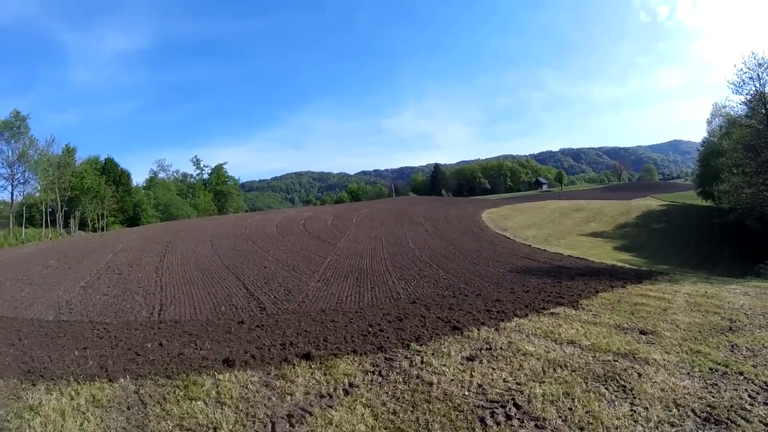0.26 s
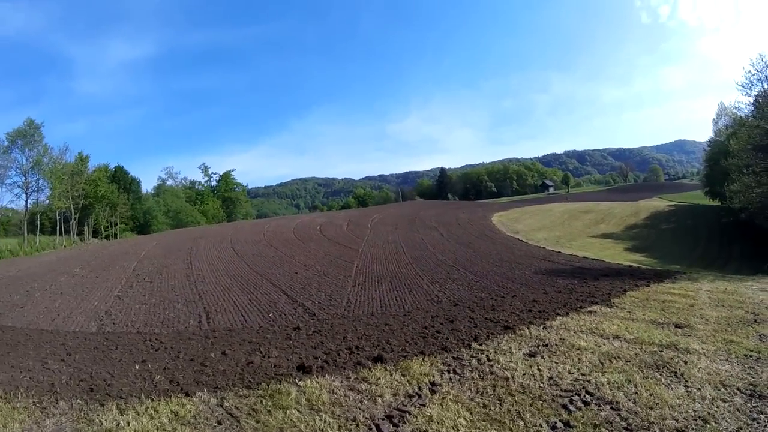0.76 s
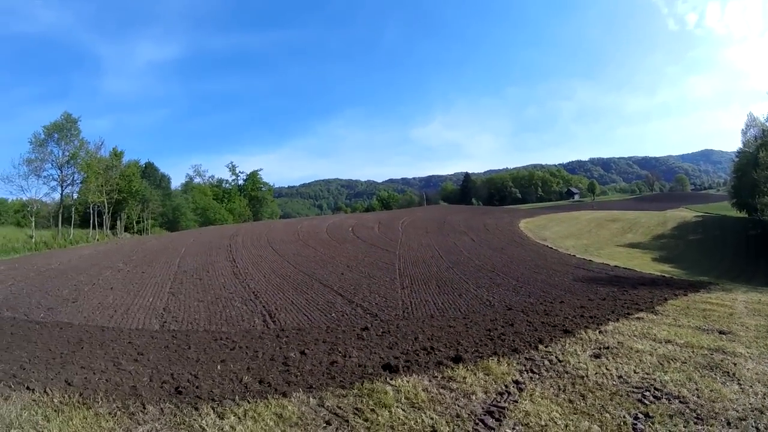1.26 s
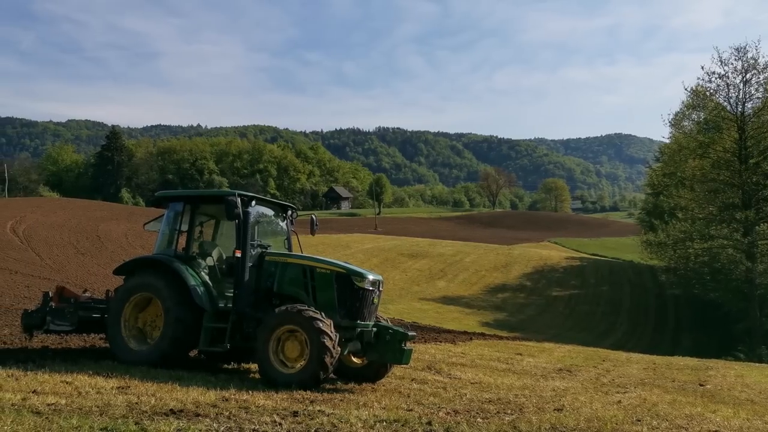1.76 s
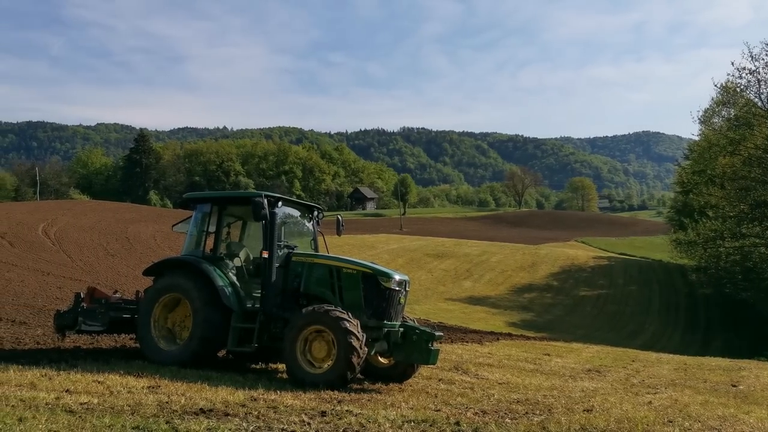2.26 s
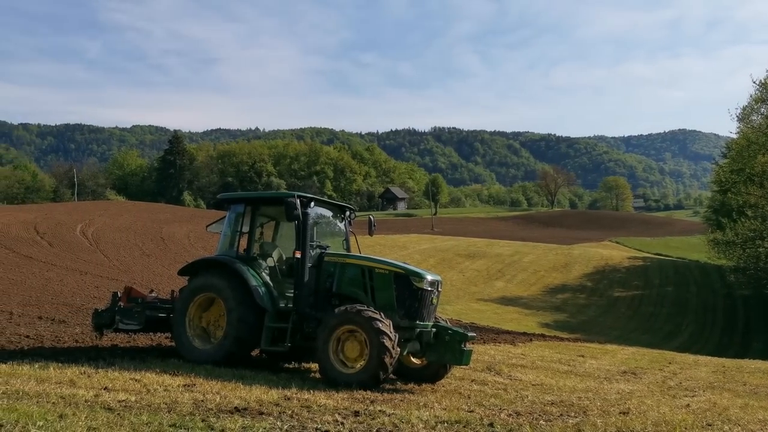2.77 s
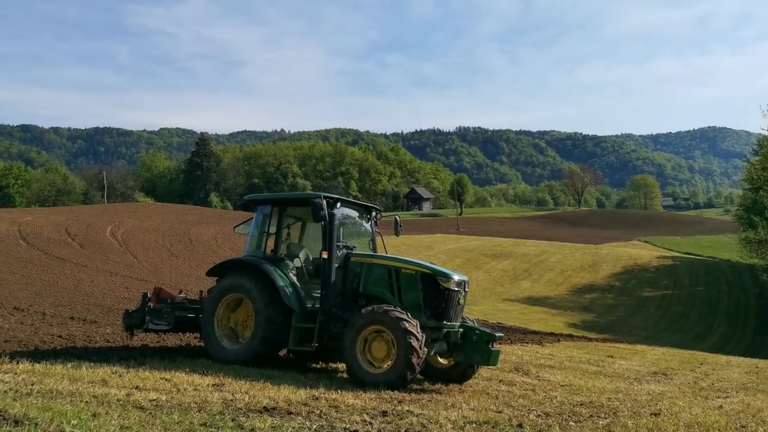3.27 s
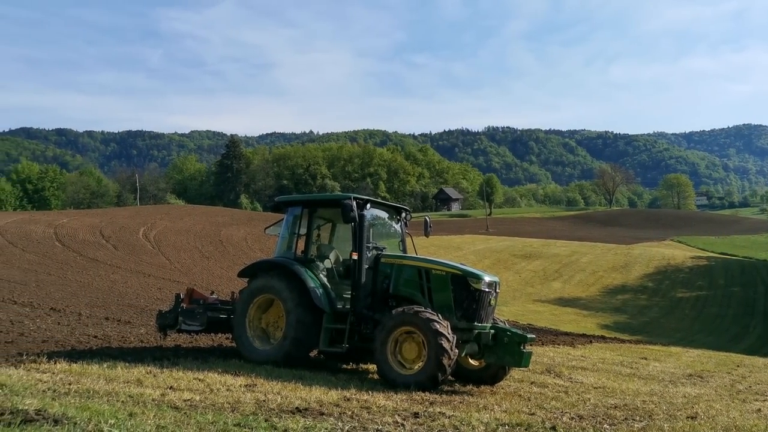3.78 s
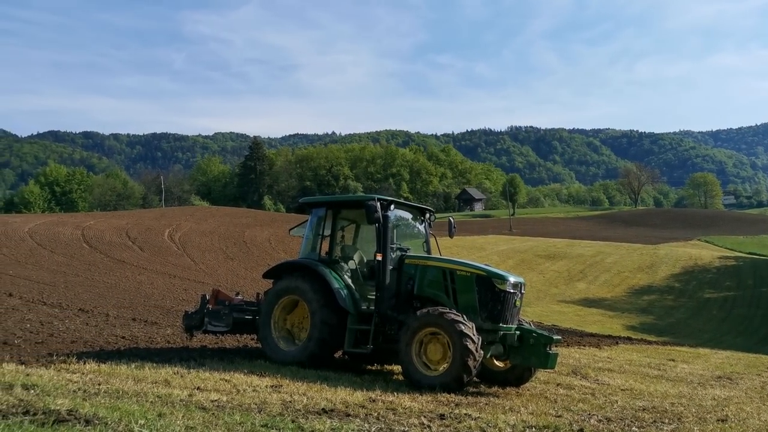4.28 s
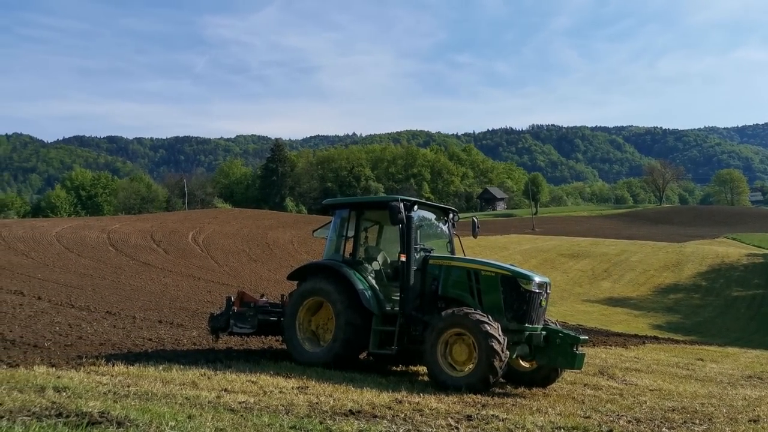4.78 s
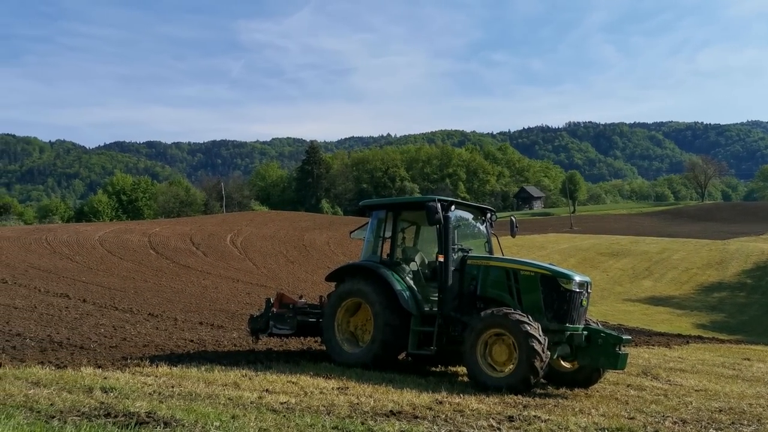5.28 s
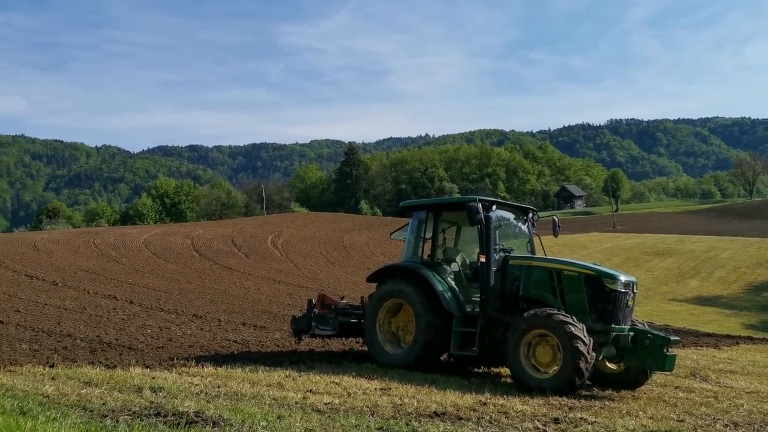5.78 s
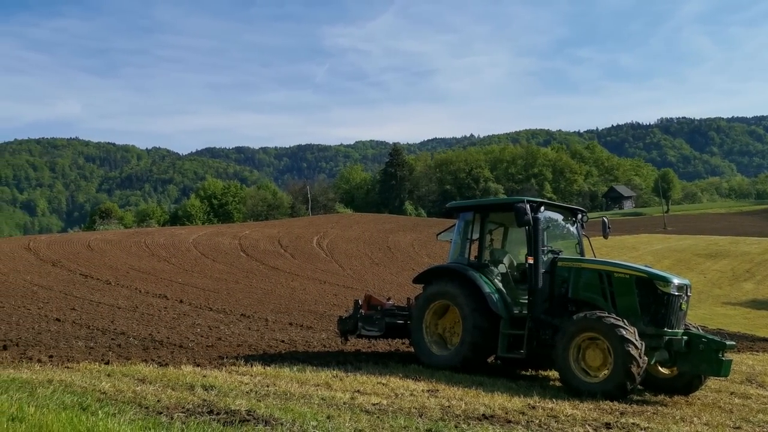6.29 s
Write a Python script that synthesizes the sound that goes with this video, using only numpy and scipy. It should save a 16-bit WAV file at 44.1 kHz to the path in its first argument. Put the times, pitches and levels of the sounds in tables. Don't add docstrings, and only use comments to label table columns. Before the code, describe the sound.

A diesel tractor drones at working revs with gear whine and jolting rumble, then abruptly switches to a quieter, slow, knocking engine clatter farther off.

```python
import sys
import numpy as np
from scipy import signal
from scipy.fft import rfft, irfft, next_fast_len
from scipy.io import wavfile
from scipy.ndimage import uniform_filter1d, map_coordinates

SR = 44100
rng = np.random.default_rng(int(sys.argv[2]) if len(sys.argv) > 2 else 0)


def wrap_up_sound(samples):
    columns = np.atleast_2d(samples).T
    tamed = np.clip(columns, -1, 1)
    steps = np.round(tamed * 32767).astype(np.int16)
    wavfile.write(sys.argv[1], SR, steps)


def level_to_linear(level):
    exponent = np.asarray(level, float) / 20
    return 10 ** exponent


N = 288414
T = np.arange(N) / SR
CUT = 1.458
NEAR_SHAFT_HZ = 25.41
FAR_SHAFT_HZ, FAR_FIRST = 14.998, 0.0195

# [f/Hz, width/Hz, lift/dB]
BLOCK = [(1150, 26, 0.5), (1373, 30, -1), (1630, 110, 3.5), (1724, 75, 0.5), (1910, 200, 5.5),
         (2037, 84, 5.5), (2295, 260, 7), (2715, 320, 2.5), (2980, 70, 1.5), (3050, 170, 6), (3268, 94, 5),
         (3420, 75, 4.5), (3670, 90, 4), (3900, 53, 2), (4110, 67, 2), (4530, 90, 4), (4700, 210, 3.5),
         (4950, 130, 4.5), (5280, 100, 3), (6730, 140, 5), (7886, 142, 12.5)]


def unit(x):
    return x / np.sqrt(np.mean(x ** 2) + 1e-20)


def along(points, hz):
    f, v = np.transpose(points)
    return np.interp(np.log(hz + 1), np.log(f + 1), v)


def wobble(rate):
    return map_coordinates(rng.standard_normal(int(N * rate / SR) + 4), [T * rate])


def filtered(x, response):
    m = next_fast_len(N + 8192)
    return irfft(rfft(x, m) * response(np.fft.rfftfreq(m, 1 / SR)), m)[..., :N]


def coloured(x, points_db):
    return filtered(x, lambda f: level_to_linear(along(points_db, f)))


def above(hz, edge_hz):
    return 1 / np.sqrt(1 + (edge_hz / (hz + 1)) ** 8)


def below(hz, edge_hz):
    return np.sqrt(1 - above(hz, edge_hz) ** 2)


def peak(hz, centre_hz, width_hz):
    return 1 / (1 + (2 * (hz - centre_hz) / width_hz) ** 2)


def spells(rows, idle_db, edge_s):
    gain = level_to_linear(idle_db)
    for start, length, db in rows:
        switched_on = np.clip((T - start) / edge_s + 0.5, 0, 1)
        switched_off = np.clip((T - start - length) / edge_s + 0.5, 0, 1)
        gain = gain + level_to_linear(db) * (switched_on - switched_off)
    return gain


def smooth_cells(shape, bands, frames):
    field = uniform_filter1d(rng.standard_normal(shape), size=bands, axis=0)
    return unit(uniform_filter1d(field, size=frames, axis=1))


def starved(x, odds):
    hz, _, z = signal.stft(x, SR, nperseg=1024)
    empty = smooth_cells(z.shape[-2:], 4, 4) < along(odds, hz)[:, None]
    return signal.istft(z * np.where(empty, 0.03, 1), SR, nperseg=1024)[1][..., :N]


def patchy(x, depth_db):
    z = signal.stft(x, nperseg=256)[2]
    gain = level_to_linear(depth_db * smooth_cells(z.shape[-2:], 6, 10))
    return signal.istft(z * gain, nperseg=256)[1][..., :N]


def firings(shaft_hz, first, cylinders_db, scatter_db):
    n = np.arange(int((T[-1] - first) * 2 * shaft_hz) + 1)
    chance = rng.standard_normal((len(n), 2))
    moment = first + n / (2 * shaft_hz) + 0.00012 * chance[:, 0]
    at = np.clip(moment * SR, 0, N - 1).astype(int)
    return np.bincount(at, level_to_linear(np.array(cylinders_db)[n % 4] + scatter_db * chance[:, 1]), N)


def gate(blows, rise, t60, steady):
    t = np.arange(SR // 10) / SR
    burst = (1 - np.exp(-t / rise)) ** 2 * level_to_linear(-60 * t / t60)
    return unit(steady + unit(signal.fftconvolve(blows, burst)[:N]))


def racket(body, knock, tick, knock_hz, tick_hz):
    noise = rng.standard_normal((3, 2, N))
    bass = filtered(body * noise[0], lambda f: below(f, knock_hz))
    middle = filtered(knock * noise[1], lambda f: above(f, knock_hz) * below(f, tick_hz))
    top = filtered(tick * noise[2], lambda f: above(f, knock_hz) * above(f, tick_hz))
    return bass + middle + top


def rocking():
    # [t/s, strength/dB]
    jolts = [
        (0.0, 5),
        (.29, 7),
        (.57, 6.5),
        (.84, 6.5),
        (1.18, 0),
        (1.41, 8.5),
    ]
    half_width = 0.056
    swell = sum(db * np.exp(-((T - s) / half_width) ** 2 / 2) for s, db in jolts)
    return np.where(T < CUT, swell - swell[T < CUT].mean(), 0)


def cab_noise(boom_db):
    # [f/Hz, density/dB per Hz]
    low_colour = [(15, -21), (30, -3), (60, -3.5), (120, -6), (200, -6), (240, -11.5), (430, -6),
                  (630, -12.5), (1200, -14), (1500, -17.5), (1700, -18.5)]
    high_colour = [(1700, -19), (3000, -23.5), (4100, -31.5), (4700, -28.5), (6000, -34), (6500, -31.5),
                   (7300, -42.5), (8000, -40.5), (10000, -55.5), (11400, -58.5), (12000, -62), (14400, -66),
                   (15200, -72)]
    # [f/Hz, threshold/sigma]
    holes = [(6500, -4), (7200, -.5), (9000, -.5), (10500, -1.6), (12000, -4)]
    top_hz = 15150
    blows = firings(NEAR_SHAFT_HZ, 0.018, [1.5, 6.0, 2.5, 1], scatter_db=2.5)
    clatter = gate(blows, rise=0.0014, t60=0.039, steady=4.3) * level_to_linear(0.031 * boom_db + 0.76 * wobble(15.2))
    rumble = level_to_linear(1.1 * boom_db)
    body = level_to_linear(0.067 * boom_db + 0.28 * wobble(12.0))
    noise = racket(rumble, body, clatter, 97, 1230)[0]
    colour = low_colour + high_colour[1:]
    noise = filtered(noise, lambda f: level_to_linear(along(colour, f)) * (f < top_hz))
    return starved(level_to_linear(-26.5) * unit(noise), holes)


def gear_meshes():
    # [f/Hz, width/Hz, rms level/dB]
    gears = [(758.4, 4.7, -41), (791, 8, -50), (855, 17, -42), (965, 6.4, -47), (1038, 5.7, -41),
             (1148, 14, -46.5), (1601, 80, -39)]

    def mesh(f):
        return sum(level_to_linear(db) / np.sqrt(w / SR * np.pi) * peak(f, c, w) for c, w, db in gears)
    return filtered(rng.standard_normal(N), mesh)


def lift_pump(boom_db):
    # [start t/s, length/s, level/dB]
    work = [
        (.15, .8, -51.5),
    ]
    hiss = unit(filtered(rng.standard_normal(N), lambda f: peak(f, 4700, 450)))
    pitch_hz = 4620 + 90.7 * wobble(9) + 70.2 * wobble(400)
    note = 1.1 * np.sin(2 * np.pi * np.cumsum(pitch_hz) / SR)
    strength = spells(work, idle_db=-62, edge_s=0.074) * level_to_linear(0.65 * boom_db + 2.9 * wobble(25))
    return strength * unit(hiss + note)


def gear_whine(turns):
    # [start t/s, length/s, level/dB]
    singing = [
        (-.05, .13, -37),
        (.47, .72, -33.5),
        (1.235, .3, -36.5),
    ]
    teeth = 698.5 / NEAR_SHAFT_HZ
    strength = spells(singing, idle_db=-40.5, edge_s=0.04) * level_to_linear(2 * wobble(21.83))
    return 1.03 * strength * np.sin(2 * np.pi * turns * teeth + 0.88 * wobble(30.4))


def passing_racket(body_db, clatter_db):
    # [f/Hz, likeness 0 to 1]
    alike = [(30, 0.46), (70, 0.87), (130, 0.97), (600, .99), (1300, 0.87), (2000, 0.52), (3400, 0.043),
             (5000, 0.063), (9000, 0.053)]
    blows = firings(FAR_SHAFT_HZ, FAR_FIRST + 0.001, [0.2, -1.6, -0.9, 1.9], scatter_db=1.2)
    body = gate(blows, rise=0.0046, t60=0.11, steady=2.0) * level_to_linear(1.1 * body_db + 0.19 * wobble(9.9))
    knock = gate(blows, rise=0.0075, t60=0.085, steady=0.62) * level_to_linear(clatter_db + 0.2 * wobble(4.96))
    ticks = firings(FAR_SHAFT_HZ, FAR_FIRST, [4.2, 1.0, 3.0, 3.2], scatter_db=1.5)
    tick = gate(ticks, rise=0.0025, t60=0.082, steady=0.62) * level_to_linear(clatter_db + 0.21 * wobble(5.26))

    def ring_and_spread(f):
        ring_db = sum(db * peak(f, c, w) ** 2 for c, w, db in BLOCK)
        angle = np.arccos(np.clip(along(alike, f), 0, 1)) / 2
        return level_to_linear(ring_db) ** 1.04 * np.array([np.cos(angle), np.sin(angle)])
    return filtered(patchy(racket(body, knock, tick, 1040, 7400), depth_db=0.5), ring_and_spread)


def nozzles():
    t = np.arange(SR // 20) / SR
    ping = (1 - np.exp(-t / 0.001)) * level_to_linear(-60 * t / 0.027) * np.sin(2 * np.pi * 7630 * t)
    lifts = firings(FAR_SHAFT_HZ, FAR_FIRST + 0.001, [8.0, -6, 0.3, -1.0], scatter_db=3.5)
    return unit(signal.fftconvolve(lifts, ping)[:N])


def struck_block():
    t = np.arange(SR // 20) / SR
    swell = (1 - np.exp(-t / 0.006)) ** 2
    total = np.zeros(N)
    for c, w, db in BLOCK:
        blows = firings(FAR_SHAFT_HZ, FAR_FIRST + 0.0035, [0.49, -0.2, -0.43, 0.34], scatter_db=4.5)
        ring = swell * np.exp(-np.pi * w * 1.2 * t) * np.sin(2 * np.pi * c * t)
        total += signal.fftconvolve(blows, level_to_linear(2.32 * db) * np.sqrt(w) * ring)[:N]
    return unit(total)


def exhaust_orders(table, turns, spread, drift, unsteady_db):
    total = np.zeros(N)
    for k, db in table:
        strength = np.sqrt(2) * level_to_linear(db + unsteady_db * wobble(6.49))
        phase = spread * rng.standard_normal() + drift * np.sqrt(k) * wobble(5)
        total -= strength * np.cos(2 * np.pi * k * turns + phase)
    return total


def on_board():
    # [shaft order, rms level/dB]
    near_orders = [(1, -37), (2, -32), (4, -31), (6, -32.5), (7, -39.5), (7.5, -45.5), (8, -40),
                   (10, -45.5), (12, -48.5), (14, -37.5), (16, -56), (18, -40.5), (22, -48)]
    boom_db = rocking()
    turns = NEAR_SHAFT_HZ * (T - 0.004 + 0.00066 * wobble(3.84))
    take_up_db = np.clip((T - 0.47) / 0.07, 0, 1) - 0.7
    exhaust = exhaust_orders(near_orders, turns, spread=1.2, drift=0.063, unsteady_db=1.0)
    exhaust = level_to_linear(0.24 * boom_db + take_up_db) * exhaust
    return cab_noise(boom_db) + gear_meshes() + lift_pump(boom_db) + gear_whine(turns) + exhaust


def two_ports(mid, side):
    # [f/Hz, gain/dB]
    bass = [(12, -28), (30, -2), (70, -2), (110, -1), (170, 3), (250, -3), (320, -1), (450, -6.5),
            (700, -6), (950, -19.5)]
    left_port = [(950, -21), (1950, -18), (2450, -28), (3350, -17), (4600, -21.5), (5200, -30.5),
                 (7200, -33), (7700, -73), (8200, -33.5), (9300, -26.5), (10200, -34), (12700, -34.5),
                 (14300, -42.5), (16000, -50)]
    right_port = [(950, -20.5), (1900, -18.5), (2950, -25), (4600, -14.5), (5050, -17), (5400, -25.5),
                  (5900, -31.5), (6900, -26.5), (7700, -24.5), (8300, -80), (9200, -59), (10600, -44.5),
                  (16000, -42)]
    # [f/Hz, gain/dB]
    left_turned = [(2400, 0), (2650, 8.5), (2950, 4.5), (3250, -6.5), (3900, -1.5), (5500, -1), (6500, 2.5),
                   (8000, 6.5), (9200, -2.5), (10000, -3.5), (10700, 8.5), (11500, 3), (12700, -6),
                   (14000, 1)]
    right_turned = [(1600, 0), (1900, 4.5), (2150, -1.5), (2650, 9), (3000, -11), (4300, 0.5), (4650, 1),
                    (5100, 2.5), (5800, 5), (6500, -4.5), (7800, 1.5), (8300, 4), (9500, 0)]
    left = coloured(mid + side, bass + left_port[1:])
    right_colour = bass[:-1] + right_port
    right = filtered(mid - side, lambda f: level_to_linear(along(right_colour, f) - 1.3 * below(f, 1150) ** 2))
    gone = np.clip((T - 2.8) / 3.6, 0, 1)
    right = (1 - gone) * right + gone * coloured(right, right_turned)
    left = (1 - gone) * left + gone * coloured(left, left_turned)
    return np.array([left, right])


def passing():
    # [t/s, level/dB]
    approach = [(1.47, -41.5), (2.5, -42), (3.7, -41.5), (5.1, -41.5), (5.9, -42.5), (6.54, -41)]
    # [t/s, lag/s]
    crossing = [
        (1.46, -.00006),
        (4, .00003),
        (6.54, .00014),
    ]
    # [shaft order, rms level/dB]
    far_orders = [(2, -54), (4, -46.5), (6, -48.5), (6.5, -55), (7, -66), (8, -52), (10, -56.5), (12, -46),
                  (14, -51), (15, -57), (16, -61), (18, -51), (19, -63), (20, -46.5), (21, -71),
                  (22, -53.5), (24, -65), (26, -59.5), (27, -55.5), (34, -69.5), (36, -55.5), (44, -63),
                  (58, -72), (64, -70), (72, -74), (78, -73), (80, -70), (88, -78), (92, -74.5),
                  (94, -65.5)]
    s, db = np.transpose(approach)
    body_db = np.interp(T, s, db - np.mean(db))
    clatter_db = 0.16 * body_db
    turns = FAR_SHAFT_HZ * (T - 0.0012 + 0.00025 * wobble(1.533))
    mid, side = passing_racket(body_db, clatter_db)
    mid = mid + level_to_linear(clatter_db - 9) * struck_block() + level_to_linear(-21) * nozzles()
    exhaust = level_to_linear(body_db / 2) * exhaust_orders(far_orders, turns, spread=0.5, drift=0.1, unsteady_db=1.3)
    pair = level_to_linear(-38.5) * unit(two_ports(mid, side)) + exhaust * level_to_linear([[0.7], [-0.8]])
    lag = np.interp(T, *np.transpose(crossing)) * SR
    left = map_coordinates(pair[0], [np.arange(N) - lag], mode="nearest")
    return np.array([left, pair[1]])


def scene():
    # [f/Hz, threshold/sigma]
    holes = [(12000, -4), (13500, -1.2), (14500, -.5), (15700, .4)]
    near = on_board() * np.clip((CUT - T) / 0.0025, 0, 1) * np.clip(0.37 + T / 0.0014, 0, 1)
    far = starved(passing(), holes) * np.clip((T - CUT) / 0.011, 0, 1)
    return near + far


def top_cut(x):
    return signal.sosfilt(signal.butter(12, 15700, fs=SR, output="sos"), x)


def record(dry):
    return top_cut(dry)


dry = scene()
out = record(dry)
wrap_up_sound(out)
```